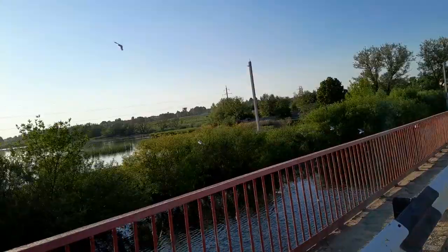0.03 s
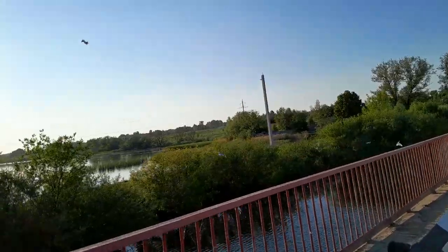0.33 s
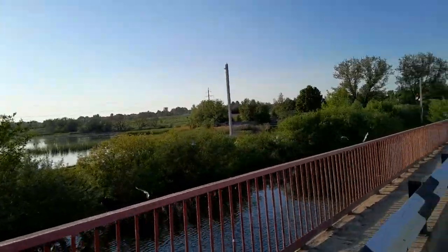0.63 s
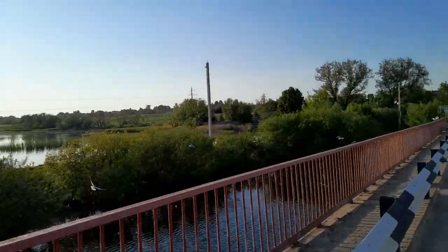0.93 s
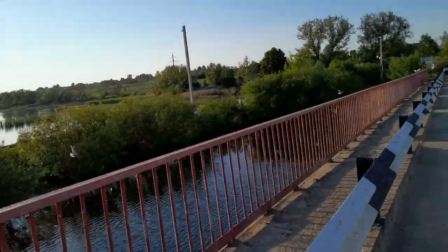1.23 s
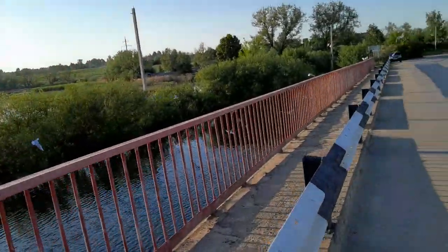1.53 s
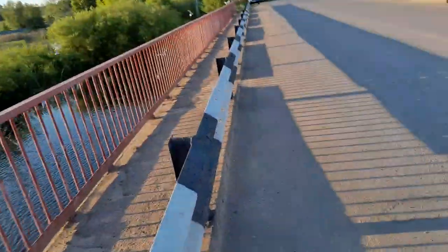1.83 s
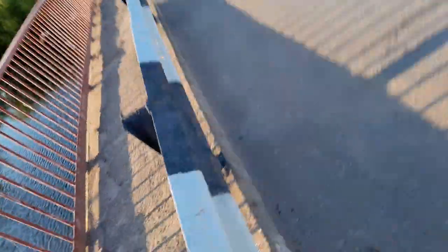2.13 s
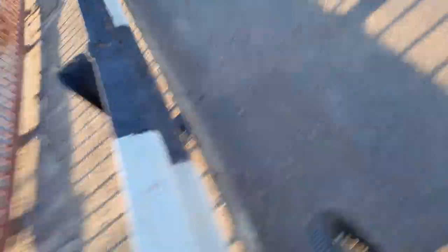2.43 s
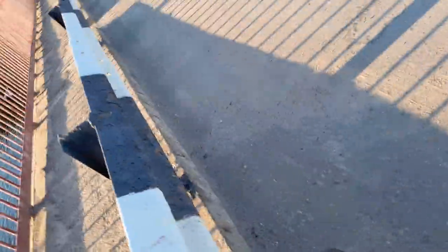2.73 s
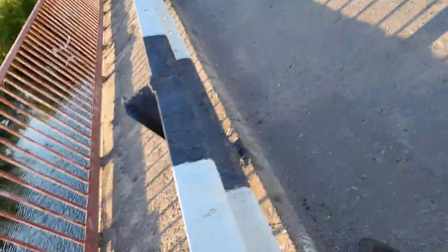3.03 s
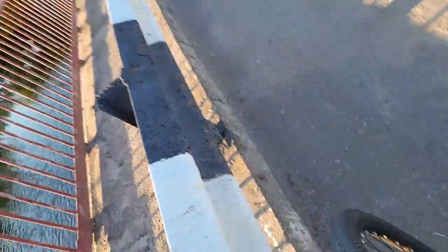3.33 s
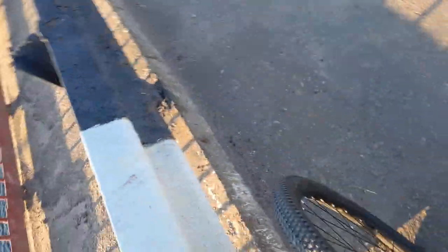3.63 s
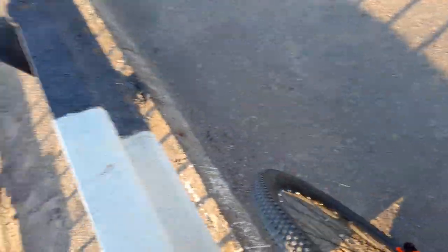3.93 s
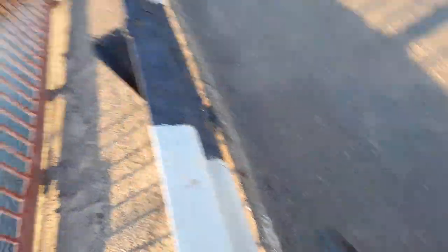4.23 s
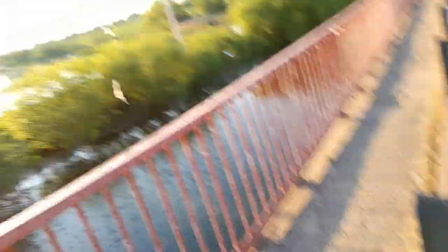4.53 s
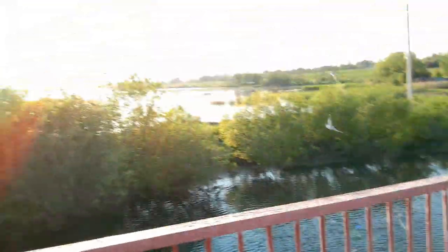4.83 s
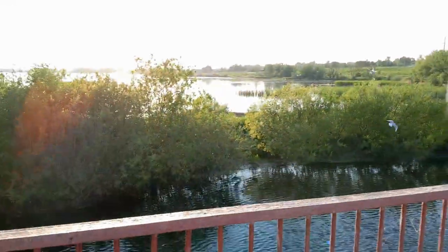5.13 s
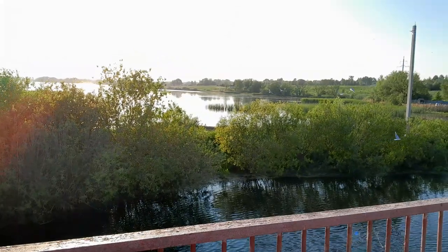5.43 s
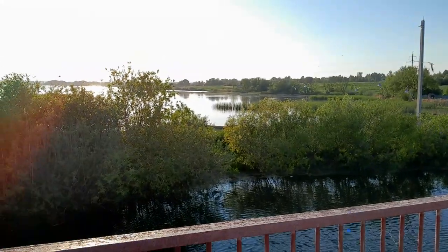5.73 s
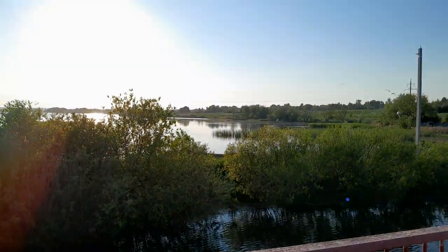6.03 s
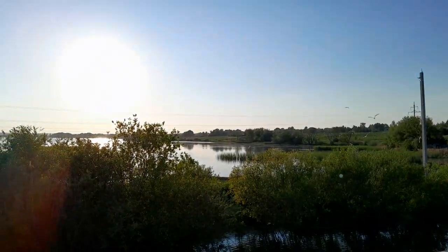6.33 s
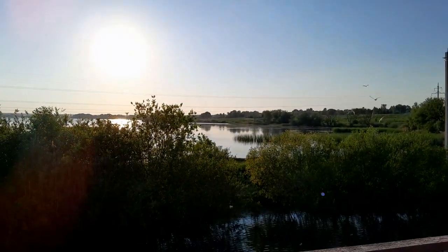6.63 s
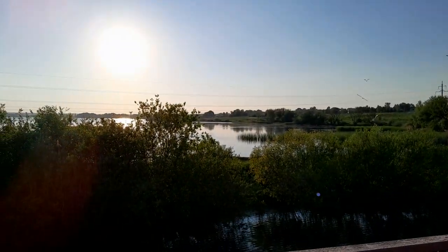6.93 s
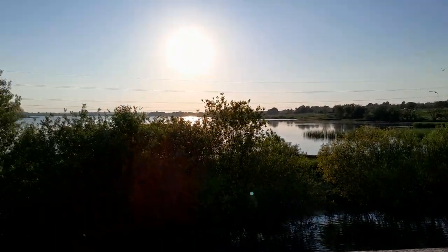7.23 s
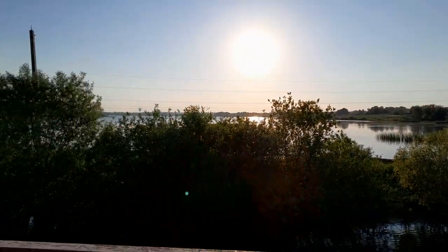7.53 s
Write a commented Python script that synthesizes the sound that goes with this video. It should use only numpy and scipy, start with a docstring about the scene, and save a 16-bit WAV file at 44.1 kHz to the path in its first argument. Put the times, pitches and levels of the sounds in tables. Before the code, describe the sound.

Gulls cry harshly over a river while wind buffets the microphone and a bicycle scrapes and knocks against a ringing steel rail.

```python
"""Gulls over a river, heard from a road bridge. First, gusts buffet the microphone over a bright hiss while
a nearby gull cries: fast pulses of its voice make a rasp, then a trill. A nasal mew follows. The hand
holding the microphone bumps and rustles, and a bicycle squeaks, scrapes and knocks against the steel
guard rail, which rings. The hiss drops away, the colony answers from the reeds and two more gulls cry
nearer by. At the end a far murmur swells. The water runs softly throughout."""
import sys
import numpy as np
from scipy import signal
from scipy.fft import rfft, irfft, next_fast_len
from scipy.io import wavfile
from scipy.ndimage import uniform_filter1d, map_coordinates

SR = 44100
rng = np.random.default_rng(int(sys.argv[2]) if len(sys.argv) > 2 else 0)


def to_wav(sig):
    """Store sig (one row per channel, or 1-D mono) as 16-bit WAV at the path in sys.argv[1].

    Samples outside -1..1 are clipped; the rate is SR.
    """
    pcm = np.clip(np.atleast_2d(sig), -1, 1) * 32767
    pcm = np.round(pcm).astype(np.int16)
    wavfile.write(sys.argv[1], SR, pcm.T)  # frames by channels


N = 339129
TIME = np.arange(N) / SR

# Nearer gulls: start_s, rasp_s, trill_s, top_hz, fall_share, trill_hz, level_db, hoarse_share,
# pulses_per_s, overtone_db, pan_db, lag_ms. A share runs from 0 to 1; a pan above 0 is to the left.
NEAR_CRIES = [(0.198, .338, .143, 1090, .02, 922, -36, .95, 56, -3.5, -4, -0.11),
              (4.53, .243, .041, 1232, .065, 905, -38.5, .25, 53, 1.5, 0, 0.044),
              (6.26, .17, .17, 1060, .03, 920, -56, .8, 55, -1, 0, .1)]
def near_gulls(attack_s=.02, swell_db=8.5, break_s=.007, trill_db=5, trill_rasp=.22):
    """Each cry starts as a high, swelling rasp and breaks into a lower, louder trill that droops."""
    out = np.zeros((2, N))
    for (start, rasp_s, trill_s, top_hz, fall, trill_hz, level_db, hoarse,
         pulses_per_s, overtone_db, pan_db, lag_ms) in NEAR_CRIES:
        on = (TIME > start) & (TIME < start + rasp_s + trill_s)
        t = TIME[on] - start
        along_rasp = np.minimum(t / rasp_s, 1)
        along_trill = np.maximum(t - rasp_s, 0) / trill_s
        in_trill = np.clip((t - rasp_s) / break_s + .5, 0, 1)
        rasp_pitch = top_hz * arch(along_rasp, rise=.08 * hoarse, fall=fall)
        trill_pitch = trill_hz * arch(along_trill, rise=.2 * trill_s, fall=.0417)
        pitch = (1 - in_trill) * rasp_pitch + in_trill * trill_pitch
        rasp = (1 - in_trill) * (hoarse + (1 - hoarse) * along_rasp) + in_trill * trill_rasp
        effort = from_db(level_db - swell_db * (1 - along_rasp) + trill_db * in_trill)
        fade_in = np.minimum(t / attack_s, 1)
        voice = cry(pitch, rasp, np.full(len(t), pulses_per_s), hoarse, overtone_db)
        out[:, on] += place(fade_in * effort * voice, pan_db, lag_ms)
    return out


def arch(along, rise, fall, crest=.33):
    """The pitch of a note as a share of its top: it climbs to a crest and falls away."""
    before = np.maximum(1 - along / crest, 0)
    after = np.maximum(along - crest, 0) / (1 - crest)
    return 1 - rise * before ** 2 - fall * after ** 2


def cry(pitch, rasp, pulses_per_s, hoarse, overtone_db, low_ratio=.92, low_db=-4):
    """A gull's voice box has two sides; in a hoarse rasp one sounds lower and beats against the other."""
    rough = hoarse * rasp
    high = voice_box(pitch, rasp, pulses_per_s, rough, overtone_db)
    uneven_rate = pulses_per_s * (1 + .094 * drift(20, len(pitch)))
    low = voice_box(pitch * low_ratio, rasp, uneven_rate, rough, overtone_db)
    share = from_db(low_db) * rough
    return (high + share * low) / np.sqrt(1 + share ** 2)


# How a gull's throat boosts or softens each frequency: frequency_hz, level_db
GULL_THROAT = [(1350, 0), (1600, -1), (1830, 7), (2100, 1), (2450, -4), (2750, -14), (3150, -17),
               (3700, -24), (4200, -20), (4700, -11), (5600, -10), (6600, -26), (7600, -18), (9500, -34)]
def voice_box(pitch, rasp, pulses_per_s, hoarse, overtone_db, sag=.21, jitter=.01496, harsh_db=9):
    """One side of the voice: fast pulses jump up to pitch, hold it and drop; rasp deepens the drop."""
    size = len(pitch)
    pulses_left = np.cumsum(pulses_per_s[::-1])[::-1] / SR
    height = np.abs(np.sin(np.pi * pulses_left))
    unsteady = jitter * hoarse * (drift(900, size) + drift(89.7, size))
    hz = pitch * (1 - sag * rasp * (1 - height) ** 2) * (1 + unsteady)
    phase = 2 * np.pi * np.cumsum(hz) / SR
    voice, power = 0, 0
    for k in range(2, 9):
        gain = from_db(at_hz(GULL_THROAT, k * hz))
        if k > 2:  # upper overtones sound at the height of a pulse, louder in a hoarse voice
            gain = gain * height * from_db(overtone_db + harsh_db * hoarse + 3.2 * drift(49.6, size))
        voice += gain * np.sin(k * phase)
        power += gain ** 2 / 2
    shimmer = from_db(3.5 * hoarse * drift(400, size))
    pulses = (.35 * rasp + np.tanh(2 * height)) * shimmer  # a rasp keeps sounding between pulses
    average_level = np.sqrt(uniform_filter1d(power * pulses ** 2, size=SR // 25))
    return voice * pulses / average_level


def mew(start_s=1.01, length_s=.22, top_hz=767, level_db=-51.5, bend=.18, hoarse=.024, beak_hz=2300):
    """One hoarse, nasal call with an open beak: a few overtones rise and fall together."""
    lift = np.sin(np.pi * np.clip((TIME - start_s) / length_s, 0, 1) ** 1.2)
    pitch = top_hz * (1 - bend * (1 - lift)) * (1 + hoarse * drift(400))
    phase = 2 * np.pi * np.cumsum(pitch) / SR
    voice = 0
    for k in range(2, 6):
        octaves_away = abs(np.log2(k * top_hz / beak_hz))
        voice += from_db(4 * drift(90) - 6 * octaves_away) * np.sin(k * phase)
    return place(from_db(level_db) * np.abs(lift) ** .5 * rms_one(voice), pan_db=-2.5, lag_ms=.43)


# A full distant cry (rasp, sinking trill, low last note): time_s, pitch_ratio, level_db, rasp_share
DISTANT_CRY_SHAPE = [(0, .93, -2.5, 1), (.2, 1.02, -3.5, 0.99), (.27, .9, 1, .6), (.37, .83, 1.5, 0.32),
                     (.39, .7, -3.5, .3), (.47, .64, -1.5, 0.29)]
# Gulls in the reeds: start_s, length_s, top_hz, level_db, pan_db
DISTANT_CRIES = [(2.6, .47, 1022, -63.5, -4), (3.05, 0.14, 1030, -61, -1), (3.489, 0.4, 1023, -52, -4),
                 (3.878, 0.26, 1054, -55, 0), (4.299, 0.33, 1054, -55.5, 0),
                 (4.593, .29, 1079, -45.5, -1.5), (5.051, 0.43, 1045, -53.5, -4),
                 (5.542, .2, 1045, -52.5, -3), (5.757, .23, 1078, -54.5, -4.5),
                 (6.041, 0.48, 1023, -54, -2), (6.989, 0.47, 1025, -55, -3.5)]
def distant_gulls(waver=.012, flutter_db=2.2, air_hz=3000):
    """Distant cries follow one shape, short ones breaking off early; the air dulls and shakes them."""
    out = np.zeros((2, N))
    for start, length, top_hz, level_db, pan_db in DISTANT_CRIES:
        on = (TIME > start) & (TIME < start + length)
        t, size = TIME[on] - start, on.sum()
        pitch_ratio, effort_db, rasp = in_time(DISTANT_CRY_SHAPE, t)
        pitch = top_hz * pitch_ratio * (1 + waver * drift(29.88, size))
        voice = cry(pitch, rasp, pulses_per_s=55 + 2 * drift(10, size), hoarse=1, overtone_db=-15)
        level = from_db(level_db + effort_db + flutter_db * drift(59, size))
        fade = np.sin(np.pi * t / length) ** .29
        out[:, on] += place(level * fade * voice, pan_db, lag_ms=.45 + .2 * rng.uniform(-1.08, 1))
    return butter(out, air_hz, "low")


# The bicycle rubs on the rail: start_s, length_s, level_db, treble_db
BICYCLE_SCRAPES = [(1.884, 0.017, -31, -2.5), (2.114, 0.056, -41.5, 3), (2.295, 0.022, -29, 0.5),
                   (2.317, 0.037, -24.5, 4), (2.37, 0.028, -25, 4), (2.407, 0.016, -28.5, -5.5),
                   (2.431, 0.027, -21.5, -1.5), (2.544, 0.021, -32, -11), (3.341, 0.095, -51, 2),
                   (4.071, 0.061, -67, 13.5), (4.887, 0.12, -46.5, -10)]
# It knocks sharply: start_s, level_db, treble_db
BICYCLE_KNOCKS = [(2.547, -29, 10), (3.271, -62, 19.5), (3.361, -37.5, 1), (3.383, -35, -4),
                  (3.421, -36, -8.5), (3.54, -38.5, -5), (6.037, -49, 2.5)]
# The tone that both share: frequency_hz, level_db
BICYCLE_TONE = [(180, -26.5), (270, -10.5), (770, -2.5), (920, -4), (1130, -3), (1300, -5), (1730, 3.5),
                (2650, -7.5), (3300, -21.5), (6300, -16), (8200, -27), (9300, -37), (15000, -40)]
def scrapes_and_knocks(grip_s=.0022, grit_db=3.5, split_hz=1800):
    """Gritty strokes and short dry knocks sound through one body, each with its own brightness."""
    force, treble_force = 0, 0
    for start, length, level_db, treble_db in BICYCLE_SCRAPES:
        grip = np.clip((TIME - start) / grip_s, 0, 1)
        stroke = from_db(level_db) * grip * dying(start + length, fade_s=.023)
        force += stroke
        treble_force += stroke * from_db(treble_db)
    for start, level_db, treble_db in BICYCLE_KNOCKS:
        blow = from_db(level_db) * struck(start, fade_s=.048)
        force += blow
        treble_force += blow * from_db(treble_db)
    slips = rms_one(rng.standard_normal(N) * from_db(grit_db * drift(900)))
    friction = place(slips, pan_db=-3.5, lag_ms=.2515) + .5 * rng.standard_normal((2, N))
    grain = rms_one(colour(friction, BICYCLE_TONE))
    body = butter(grain * force, split_hz, "low", order=3)
    edge = butter(grain * treble_force, split_hz, "high", order=3)
    return body + edge


def snap(start_s=2.566, level_db=-23.5, band_hz=(8500, 14000)):
    """One thin metallic snap: a very short burst of high noise."""
    burst = rng.standard_normal((2, N)) * struck(start_s, fade_s=.0095)
    return from_db(level_db) * butter(burst, band_hz, "band")


# The notes of the steel rail: pitch_hz, level_db
RAIL_NOTES = [(270, -7), (515, -2), (585, -4), (645, -2.5), (773, 4), (828, -4), (1099, 5), (1118, 4.5),
              (1153, -1), (1475, -2), (1587, -13), (1815, 3), (2190, 4)]
def rail(bicycle, ring_db=-47):
    """The steel rings on after the bicycle's hardest scrapes, the low notes longest."""
    touch = bicycle * swell(start_s=2.29, length_s=.25, edge_s=.0031)
    notes = sum(from_db(level_db) * rms_one(ring(touch, hz, fade_s=.35 * np.sqrt(1000 / hz)))
                for hz, level_db in RAIL_NOTES)
    return from_db(ring_db) * rms_one(notes)


# The bicycle squeaks: start_s, length_s, pitch_hz, level_db
BICYCLE_SQUEAKS = [(1.62, 0.16, 6020, -56.5), (2.552, 0.018, 1830, -30.5), (3.541, 0.013, 1885, -49.5)]
def squeaks(waver=.0185):
    """Parts of the bicycle stick and slip, each time on one thin, unsteady note."""
    wobble = 1 + waver * drift(300)
    notes = 0
    for start, length, hz, level_db in BICYCLE_SQUEAKS:
        phase = 2 * np.pi * np.cumsum(hz * wobble) / SR
        notes += from_db(level_db) * swell(start, length, edge_s=.0056) * np.sin(phase)
    return place(notes, pan_db=-1.7, lag_ms=0)


# Light metal clicks: start_s, level_db
METAL_TICKS = [(2.7205, -43.5), (2.7238, -48)]
# Their dry ring: pitch_hz, fade_s
TICK_NOTES = [(1300, .006), (4350, .005), (7500, .003)]
def ticks():
    """Small metal parts click together, bright and dry."""
    touch = sum(from_db(level_db) * struck(start, fade_s=.013) for start, level_db in METAL_TICKS)
    return sum(ring(touch * rng.standard_normal((2, N)), hz, fade_s) for hz, fade_s in TICK_NOTES)


# The strongest gusts: start_s, length_s, level_db
WIND_GUSTS = [(0, 0.021, -30), (0.04, 0.2, -44), (0.264, 0.14, -39.5), (0.451, 0.11, -45),
              (0.565, .12, -37.5), (0.8, 0.11, -36), (0.942, 0.029, -38), (1.721, 0.16, -50),
              (2.167, 0.024, -45), (4.401, 0.21, -58.5), (5.049, 0.094, -59), (5.642, 0.17, -56)]
# The light wind between them: time_s, level_db
WIND_LEVEL = [(1, -58.5), (2.2, -54.5), (2.8, -78), (5, -63), (6, -78.5), (6.3, -59.5), (7.05, -56.5),
              (7.69, -70.5)]
# The wind's deep rumble and its higher flapping: frequency_hz, level_db
RUMBLE_TONE = [(25, -20), (55, 0.5), (95, -1.5), (160, -17), (300, -25)]
BUFFET_TONE = [(110, -0.5), (380, 1.5), (650, -14), (1100, -21.5)]
def wind(swirls_per_s=12, swirl_db=5, buffet_db=-3, lump_db=6, hard_gust_db=-36):
    """Swirling air rumbles on the microphone; the harder the gust, the more it flaps higher up."""
    light_db, = in_time(WIND_LEVEL)
    gust = from_db(light_db + swirl_db * np.minimum(drift(swirls_per_s), 1.5))
    for start, length, level_db in WIND_GUSTS:
        gust += from_db(level_db) * swell(start, length, edge_s=.022)
    lumps = rms_one(from_db(lump_db * np.array([drift(110), drift(110)])))
    reach = from_db(buffet_db) * (gust / from_db(hard_gust_db)) ** .57
    rumble = stereo_noise(RUMBLE_TONE, flicker_db=5)
    buffet = reach * lumps * stereo_noise(BUFFET_TONE, flicker_db=.5)
    return gust * (rumble + buffet)


# Dull bumps that ring the microphone's case, mostly fingers; the one at 4.658 s is the bicycle knocking:
# start_s, level_db
CASE_BUMPS = [(1.602, -29.5), (1.6113, -23), (1.6245, -29), (2.099, -37.5), (2.846, -38.5), (4.658, -42.5),
              (4.97, -43)]
# The notes of the case: pitch_hz, level_db
CASE_NOTES = [(320, -3.5), (480, -0.5), (720, 0), (1150, -6.5), (1850, -4)]
def thumps(fade_s=.024):
    """Each bump rings the case so briefly that it makes a dull thump."""
    taps = np.zeros(N)
    for start, level_db in CASE_BUMPS:
        taps[round(start * SR)] = from_db(level_db)
    notes = sum((-1) ** k * from_db(level_db) * ring(taps, hz, fade_s)
                for k, (hz, level_db) in enumerate(CASE_NOTES))
    return place(notes, pan_db=0, lag_ms=.15)


# Sleeves and hand swish as the holder turns: peak_s, half_length_s, level_db, treble_db
HAND_SWISHES = [(1.524, 0.063, -48, -7.5), (1.713, 0.16, -45.5, -7.5), (2.672, 0.43, -54, -11),
                (4.689, 0.24, -58, 5.5), (5.787, 0.26, -57, -6)]
# A low rustle and a bright hiss: frequency_hz, level_db
RUSTLE_TONE = [(150, -22), (480, 2), (1100, -9.5), (1700, -2.5), (2600, -23)]
HISS_TONE = [(2000, 7.5), (3200, -2.5), (4400, 2.5), (5400, 0.5), (7900, 2), (9500, -12)]
def swishes():
    """Cloth and skin slide: a low rustle and a hiss swell and fade together."""
    rustle, hiss = 0, 0
    for peak_s, half_length_s, level_db, treble_db in HAND_SWISHES:
        move = from_db(level_db) * np.exp(-2 * np.abs((TIME - peak_s) / half_length_s) ** 2.64)
        rustle += move
        hiss += move * from_db(treble_db)
    return rustle * stereo_noise(RUSTLE_TONE, flicker_db=2) + hiss * stereo_noise(HISS_TONE)


# The colony far off: frequency_hz, level_db
COLONY_TONE = [(900, -24.5), (1300, -11), (1650, -2.5), (2050, -10), (2500, -22), (3100, -27.5),
               (4100, -16.5), (5300, -29)]
def colony(level_db=-62):
    """Many far gulls blur into one steady wash of noise."""
    return from_db(level_db) * stereo_noise(COLONY_TONE)


# How loud the far murmur is: time_s, level_db
MURMUR_LEVEL = [(5.8, -70), (6.3, -68), (7.2, -60.5), (7.69, -64)]
# Its dull tone: frequency_hz, level_db
MURMUR_TONE = [(300, -16.5), (720, -5), (1100, -15)]
def murmur():
    """A far murmur, like traffic, swells at the end."""
    level_db, = in_time(MURMUR_LEVEL)
    return from_db(level_db) * stereo_noise(MURMUR_TONE, flicker_db=2)


# How the opening hiss rises and falls: time_s, level_db
HISS_LEVEL = [(0.0, -63.5), (2.27, -62), (2.89, -86), (4.45, -90), (4.8, -74), (5.03, -80.5), (7.69, -102)]
# A thin, very high hiss: frequency_hz, level_db
THIN_HISS_TONE = [(7500, -2), (16000, -3)]
def opening_hiss(rush_db=6, bright_db=8, thin_db=5.5, bright_follow=.89):
    """A broad, bright hiss with a faint low rush, dropping away after about two seconds."""
    level_db, = in_time(HISS_LEVEL)
    gentler_db = level_db.max() + bright_follow * (level_db - level_db.max())
    rush = from_db(level_db + rush_db) * stereo_noise(RUSTLE_TONE, flicker_db=0)
    bright = from_db(gentler_db + bright_db) * stereo_noise(HISS_TONE)
    thin = from_db(level_db + thin_db) * stereo_noise(THIN_HISS_TONE)
    return rush + bright + thin


def river(level_db=-75):
    """The water runs softly under the bridge."""
    return from_db(level_db) * stereo_noise(RUSTLE_TONE)


def microphone_hiss(level_db=-82):
    """The microphone's own thin, steady, very high background hiss."""
    return from_db(level_db) * stereo_noise(THIN_HISS_TONE)


def riverbanks(x, fade_s=.35, dull_hz=5670):
    """Scattered echoes from water, bushes and railings, different on the left and right."""
    t = TIME[:SR]
    echoes = rng.standard_normal((2, SR)) * (rng.random((2, SR)) < .03)
    echoes *= from_db(-60 * t / fade_s) * (t > .004)
    echoes /= np.sqrt(np.sum(echoes ** 2, axis=1, keepdims=True))
    return butter(signal.fftconvolve(x, echoes, axes=1)[:, :N], dull_hz, "low", order=1)


# How alike left and right are (1 is the same, 0 is unrelated): frequency_hz, likeness
STEREO_LIKENESS = [(100, 0.27), (250, 0.056), (450, 0.82), (700, -0.12), (2200, 0.12), (4400, -0.074)]
def stereo_noise(tone, flicker_db=.7):
    """Noise of the given tone, partly alike on both sides, with a flickering level; average power 1."""
    size = next_fast_len(N)
    mid, side = rfft(rng.standard_normal((2, size)))
    alike = np.clip(at_hz(STEREO_LIKENESS, np.arange(len(mid)) * SR / size), -1, 1)
    pair = irfft(np.sqrt(1 + alike) * mid + np.sqrt(1 - alike) * side * [[1], [-1]], size)[:, :N]
    return rms_one(colour(pair, tone) * from_db(flicker_db * drift(25)))


def colour(x, tone):
    """Filter a sound to the given tone, falling steeply beyond the table's ends."""
    size = 2 * next_fast_len(N // 2 + SR // 8)
    hz = np.arange(size // 2 + 1) * SR / size + 1e-3
    octaves_outside = np.abs(np.log2(hz / np.clip(hz, tone[0][0], tone[-1][0])))
    gain = from_db(at_hz(tone, hz) - np.minimum(24 * octaves_outside, 60))
    cepstrum = irfft(np.log(gain))[:size // 2]  # minimum phase: nothing rings before its cause
    cepstrum[1:] *= 2
    return irfft(rfft(x, size) * np.exp(rfft(cepstrum, size)))[..., :N]


def place(x, pan_db, lag_ms):
    """Give a sound a direction: the left side is pan_db louder and lag_ms later."""
    left = map_coordinates(x, [np.arange(len(x)) - lag_ms * SR / 1000], order=3)
    return np.array([left * from_db(pan_db / 2), x * from_db(-pan_db / 2)])


def ring(clicks, hz, fade_s):
    """Each click starts a pure note that drops 60 dB in fade_s."""
    decay, turn = from_db(-60 / (fade_s * SR)), 2 * np.pi * hz / SR
    return signal.lfilter([0, np.sin(turn)], [1, -2 * decay * np.cos(turn), decay ** 2], clicks + 1e-18)


def swell(start_s, length_s, edge_s):
    """A level that slopes up, holds at 1 and slopes down."""
    end_s = start_s + max(length_s, edge_s)
    corners = [start_s - edge_s / 2, start_s + edge_s / 2, end_s - edge_s / 2 + 1e-6, end_s + edge_s]
    return np.interp(TIME, corners, [0, 1, 1, 0])


def dying(start_s, fade_s):
    """A level of 1 until the start, then dropping 60 dB in fade_s."""
    return from_db(-60 * np.clip((TIME - start_s) / fade_s, 0, 2))


def struck(start_s, fade_s):
    """Silence, then a jump to 1 that dies away."""
    return (TIME >= start_s) * dying(start_s, fade_s)


def drift(rate, size=N):
    """A random wander, about 1 up or down, that turns about rate times a second."""
    steps = np.arange(size)
    return np.interp(steps * rate / SR, steps, rng.standard_normal(size)) * np.sqrt(3 / 2)


def butter(x, hz, kind, order=2):
    """Keep the lows, the highs or a band of a sound."""
    return signal.sosfilt(signal.butter(order, hz, kind, fs=SR, output="sos"), x + 1e-18)


def in_time(rows, t=TIME):
    """Read each column of a table at the times t."""
    times, *columns = np.transpose(rows)
    return [np.interp(t, times, column) for column in columns]


def at_hz(rows, hz):
    """Read a table at the frequencies hz, with octaves evenly spaced."""
    frequencies, values = np.transpose(rows)
    return np.interp(np.log(hz + 1e-9), np.log(frequencies), values)


def from_db(db):
    """Turn decibels into a factor to multiply by."""
    return 10 ** (np.asarray(db) / 20)


def rms_one(x):
    """Scale to an average power of 1."""
    return x / np.sqrt(np.mean(x ** 2) + 1e-20)


def scene():
    """Gulls and the bicycle echo off the banks, over the background, the hand and the wind."""
    near = near_gulls() + mew()
    far = distant_gulls()
    bicycle = scrapes_and_knocks() + snap() + squeaks()
    echoes = riverbanks(from_db(-12.5) * near + far + from_db(-9.5) * bicycle)
    clatter = bicycle + rail(bicycle) + ticks() + thumps()
    background = colony() + murmur() + opening_hiss() + river() + microphone_hiss()
    return near + far + clatter + echoes + background + swishes() + wind()


def record(dry, low_hz=30, top_hz=15900):
    """The deepest rumble and the highest treble are cut."""
    treble_cut = signal.ellip(10, .1, 70, top_hz, fs=SR, output="sos")
    return signal.sosfilt(treble_cut, butter(dry, low_hz, "high"))


dry = scene()
out = record(dry)
to_wav(out)
```